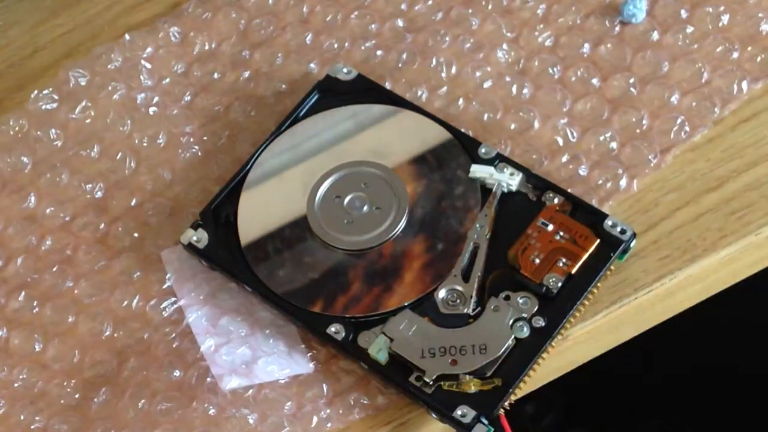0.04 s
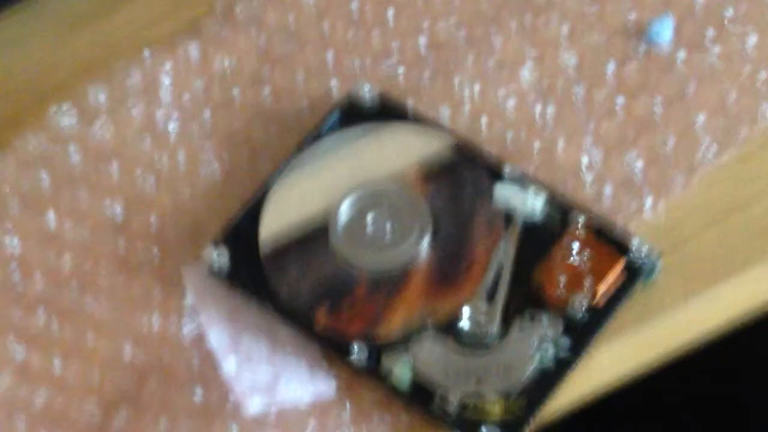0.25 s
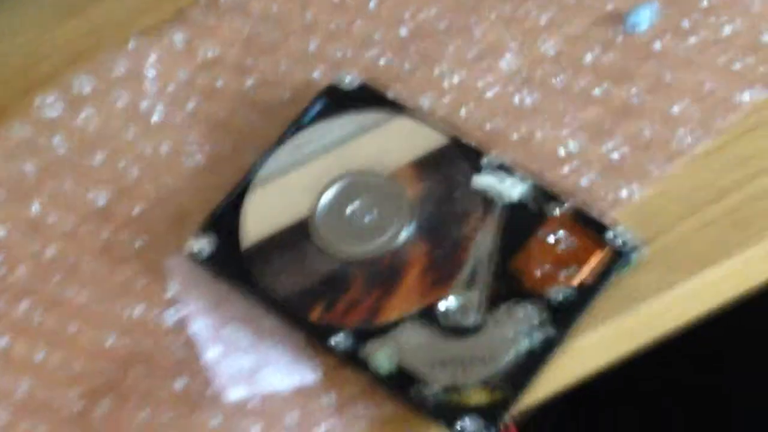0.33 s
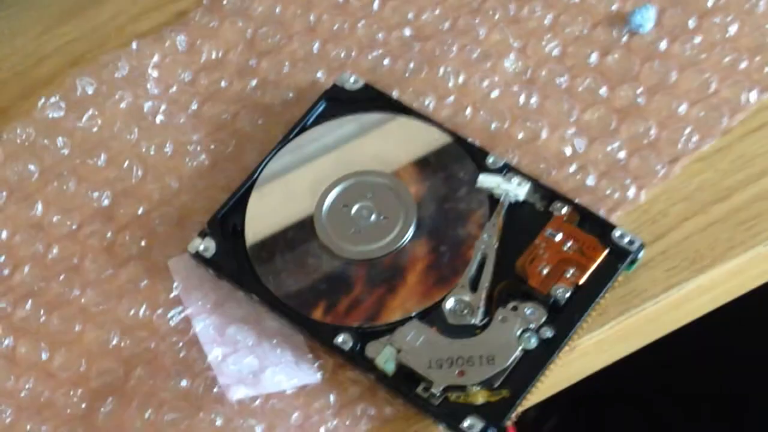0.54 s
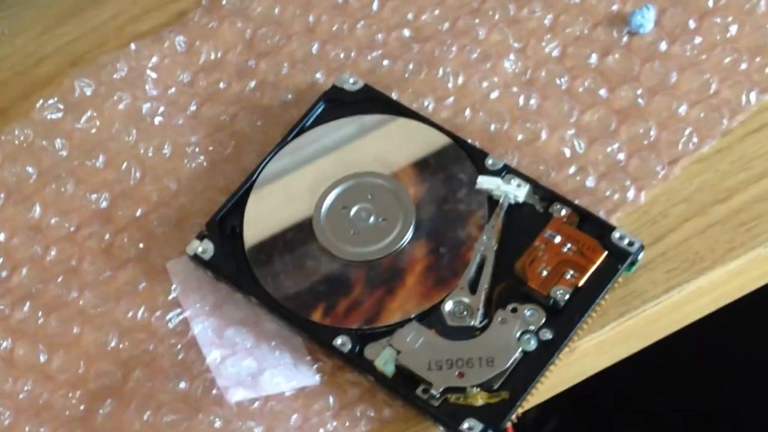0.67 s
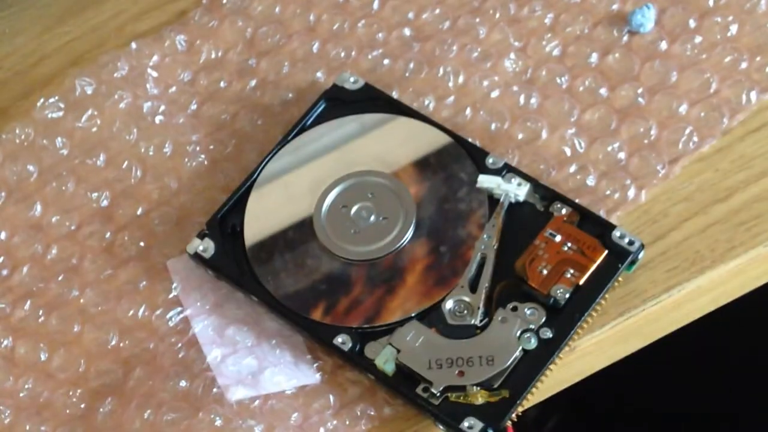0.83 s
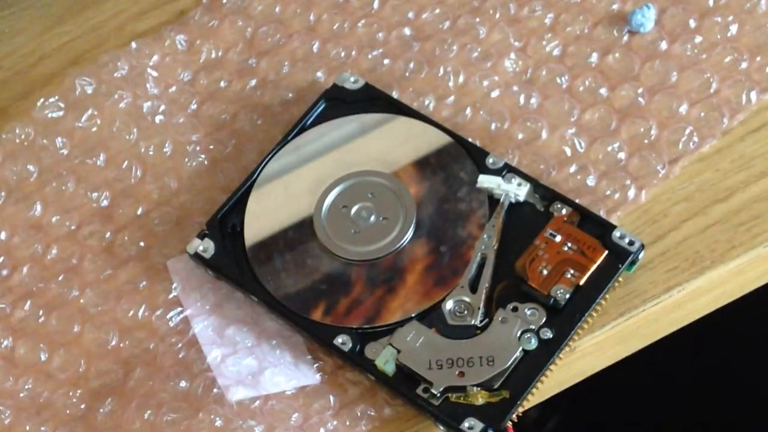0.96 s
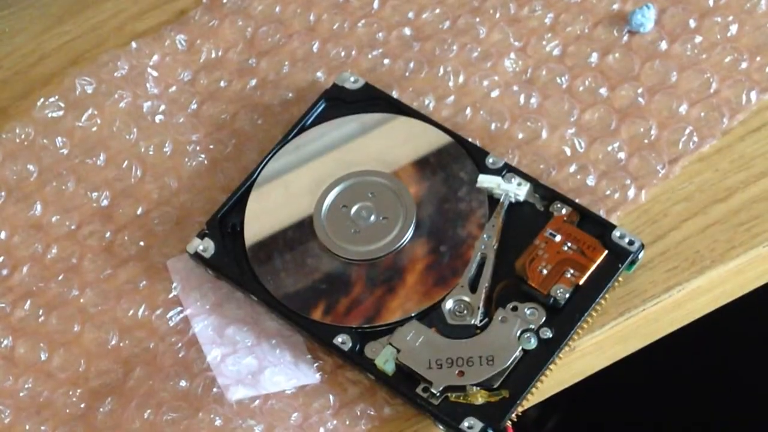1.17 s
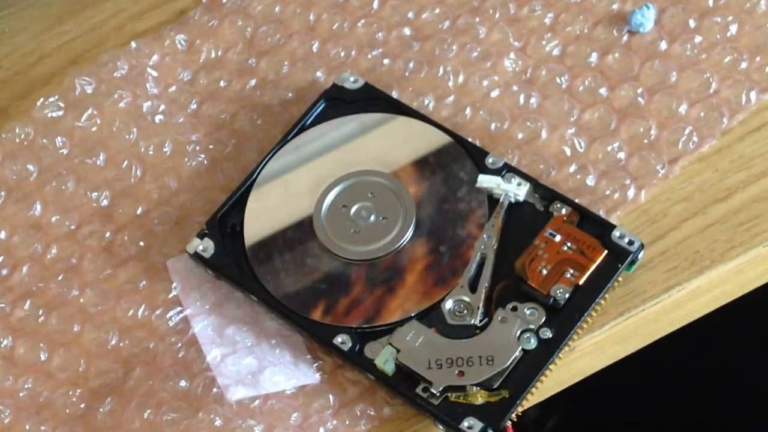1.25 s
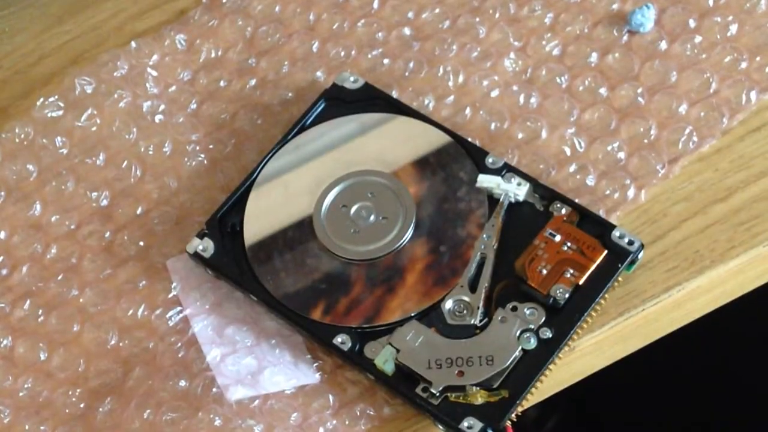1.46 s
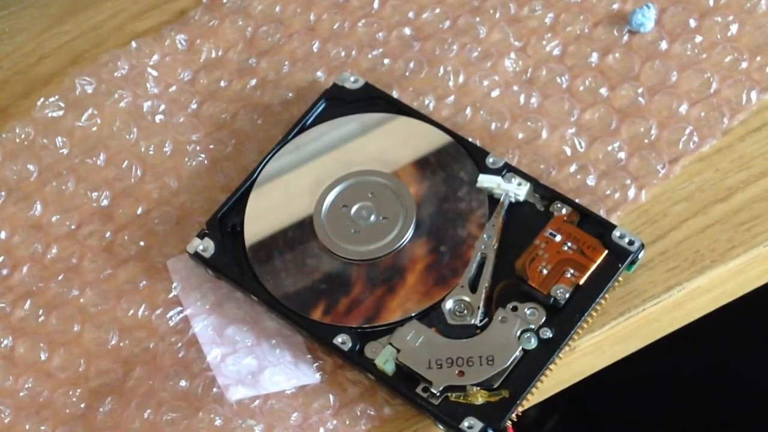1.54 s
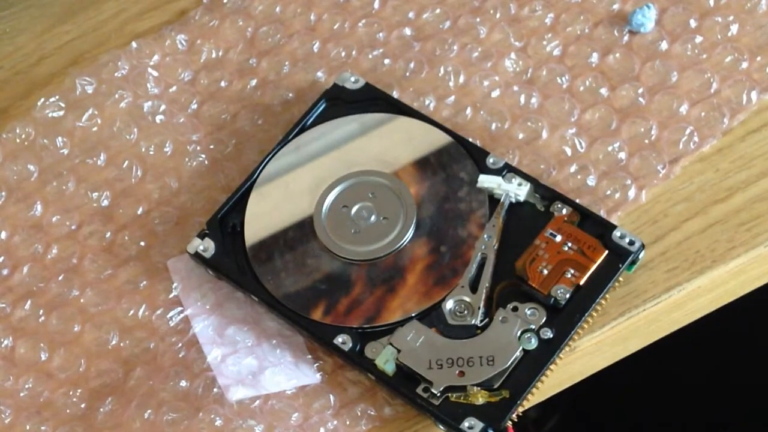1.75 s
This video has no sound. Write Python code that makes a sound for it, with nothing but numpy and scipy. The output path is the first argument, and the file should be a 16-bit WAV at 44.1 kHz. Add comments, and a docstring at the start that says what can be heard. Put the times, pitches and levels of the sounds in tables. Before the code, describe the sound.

An opened hard drive gives a tiny raspy buzz and hard metallic clack, rattles softly, then clacks twice more with low thuds of its support; close microphone, quiet room with faint hiss and hum.

```python
"""Small mechanism working once

A brief buzz, a hard clack, a rattle and a second pair of clacks sound close by in a quiet room.
Clacks are showers of contacts ringing casing modes; knocks, ticks and squeaks are resonant noise bands.
The buzz, a low panel ring and the thuds of the support are decaying sines; sliding is coloured contacts.
Diffuse tails follow the sources, over steady coloured noise and a faint hum."""
import sys
import numpy as np
from scipy import signal
from scipy.fft import rfft, irfft
from scipy.io import wavfile

SR = 44100
rng = np.random.default_rng(int(sys.argv[2]) if len(sys.argv) > 2 else 0)


def file_out(sig):
    """Save sig as 16-bit WAV at sys.argv[1]."""
    # one column per channel
    cols = np.atleast_2d(sig).T
    # limit, then scale
    lim = np.clip(cols, -1, 1)
    pcm = np.round(lim * 32767).astype(np.int16)
    wavfile.write(sys.argv[1], SR, pcm)


N = 79380  # samples


def undb(db):
    """Level to amplitude: 20 dB is a factor of ten."""
    return 10 ** (np.asarray(db) / 20)


def unit(x):
    """Normalisation to an rms of 1."""
    return x / np.sqrt(np.mean(x ** 2))


def since(start):
    """Elapsed time [s] since a moment, zero before it."""
    return np.maximum(np.arange(N) / SR - start, 0)


def fade(t, t60):
    """Exponential decay, falling 60 dB in t60 seconds."""
    return np.exp(-np.log(1000) * t / t60)


def envelope(start, attack, length, t60):
    """Linear rise from the start, then exponential decay from start + length onward."""
    rise = np.minimum(since(start) / attack, 1)
    return rise * fade(since(start + length), t60)


def burst(x, shape):
    """Energy normalisation: a signal under an envelope carries the energy of that envelope."""
    shaped = x * shape
    return shaped * np.linalg.norm(shape) / np.linalg.norm(shaped)


def octaves(hz):
    """Logarithmic frequency: distance in octaves of every spectral bin from hz."""
    bins_hz = np.arange(N // 2 + 1) * SR / N
    return np.log2(np.maximum(bins_hz, 1) / hz)


def colour(x, points, tilt_db=0):
    """Spectral shaping by interpolated levels and a tilt per octave, at rms 1."""
    hz, db = np.array(points, float).T
    pos = octaves(hz[0])
    gain_db = np.interp(pos, np.log2(hz / hz[0]), db)
    gain_db += tilt_db * np.maximum(pos, 0)
    gain_db += 10 * np.minimum(pos, 0)  # 10 dB per octave roll-off below the first point
    return unit(irfft(rfft(x) * undb(gain_db), N))


def band(hz, width, skirt=0):
    """Resonance: noise in a Gaussian band, width in octaves, over a flat skirt; rms 1."""
    response = np.exp(-.5 * (octaves(hz) / width) ** 2) + skirt
    return unit(irfft(rfft(rng.standard_normal(N)) * response, N))


CONTACTS_PER_S, CONTACT_SPREAD_DB = 5000, 2


def contacts():
    """Random impact process: dense tiny impulses of either sign and uneven strength."""
    hits = rng.random(N) < CONTACTS_PER_S / SR
    strength = undb(CONTACT_SPREAD_DB * rng.standard_normal(N))
    return hits * rng.choice([-1, 1], N) * strength


# spectrum of the room noise: (frequency [Hz], relative density [dB per Hz])
AIR_SPECTRUM = [(30, -28), (64, -9), (95, -8), (122, -4), (160, -8.5), (280, -8), (345, -10), (405, -3.5),
                (460, -9.5), (520, -7.5), (1030, -15.5), (2500, -16.5), (15000, -20)]
AIR_DB = -67
HUM_HZ, HUM_DB = 120, -80


def air():
    """Stationary noise: hiss and room murmur, with a faint mains hum as a pure tone."""
    murmur = colour(rng.standard_normal(N), AIR_SPECTRUM)
    hum = unit(np.sin(2 * np.pi * HUM_HZ * since(0)))
    return undb(AIR_DB) * murmur + undb(HUM_DB) * hum


# modes of a panel: (frequency [Hz], level [dB])
PANEL_MODES = [(308, -45.5), (370, -62)]
PANEL_S, PANEL_ATTACK_S, PANEL_LENGTH_S, PANEL_T60_S = .316, 0.0082, 0.07, .13


def panel():
    """Modal vibration: low modes swell together under the second pair of clacks, then decay."""
    tone = sum(undb(db) * np.sin(2 * np.pi * hz * since(PANEL_S)) for hz, db in PANEL_MODES)
    return tone * envelope(PANEL_S, PANEL_ATTACK_S, PANEL_LENGTH_S, PANEL_T60_S)


# spectrum of the sliding: (frequency [Hz], relative density [dB per Hz])
SLIDE_SPECTRUM = [(200, 7.5), (600, 4), (1250, -3.5), (2000, 4), (3200, -7.5), (5000, -7.5), (8000, -16),
                  (15000, -24.5)]
SLIDE_S, SLIDE_LENGTH_S, SLIDE_T60_S, SLIDE_DB = 0.241, 0.18, 0.17, -55


def sliding():
    """Friction noise: many small contacts make a soft scrape as parts move."""
    shape = envelope(SLIDE_S, 0.0072, SLIDE_LENGTH_S, SLIDE_T60_S)
    return undb(SLIDE_DB) * colour(contacts(), SLIDE_SPECTRUM) * shape


# squeaks of the settling parts: (time [s], length [s], level [dB], frequency [Hz])
SQUEAK_EVENTS = [(.433, 0.0041, -55, 5070), (0.438, 0.0039, -54.5, 5450), (0.446, 0.0072, -58.5, 5340),
                 (0.508, 0.0021, -62, 5000)]
SQUEAK_WIDTH_OCT, SQUEAK_T60_S = 0.12, 0.031


def squeaks():
    """Narrow-band friction: a small width in octaves gives noise a pitch as parts come to rest."""
    out = np.zeros(N)
    for start, length, db, hz in SQUEAK_EVENTS:
        shape = envelope(start, 0.0027, length, SQUEAK_T60_S)
        out += undb(db) * band(hz, SQUEAK_WIDTH_OCT) * shape
    return out


# thuds of the support:
# (time [s], level [dB], lower mode [Hz], rise [s], length [s], upper mode re lower [dB])
THUD_EVENTS = [(0.2035, -42, 71.8, 0.0095, 0.0365, -8.5), (.262, -35.5, 71.3, 0.008, 0.0218, -11.5),
               (0.3296, -38, 68, 0.0039, 0.01, -8), (0.393, -44, 64, 0.0053, 0.027, -16),
               (0.4218, -37.5, 65.4, 0.0037, 0.026, -1.5), (0.4688, -44, 64, 0.0046, 0.021, -4),
               (.556, -58, 71.3, 0.0078, 0.036, -12)]
SUPPORT_T60_S, UPPER_RATIO, UPPER_T60_S = 0.12, 1.755, 0.032


def thuds():
    """Damped oscillation: each jolt shakes the support in two low modes, the upper dying sooner."""
    out = np.zeros(N)
    for start, db, hz, rise, length, upper_db in THUD_EVENTS:
        phase = 2 * np.pi * hz * since(start)
        lower = np.sin(phase) * envelope(start, rise, length, SUPPORT_T60_S)
        upper = np.cos(UPPER_RATIO * phase) * envelope(start, rise, length, UPPER_T60_S)
        out += undb(db) * (lower - undb(upper_db) * upper)
    return out


# hollow knocks of the casing: (time [s], level [dB])
KNOCK_EVENTS = [(0.2114, -42), (0.373, -57)]
KNOCK_HZ, KNOCK_WIDTH_OCT, KNOCK_LENGTH_S, KNOCK_T60_S = 795, 0.28, 0.0064, 0.025


def knocks():
    """Resonance of the casing: a brief noise band gives a hollow note."""
    out = np.zeros(N)
    for start, db in KNOCK_EVENTS:
        shape = envelope(start, 0.0013, KNOCK_LENGTH_S, KNOCK_T60_S)
        out += undb(db) * burst(band(KNOCK_HZ, KNOCK_WIDTH_OCT), shape)
    return out


# dry ticks: (time [s], level [dB], centre [Hz], width [octaves], t60 [s])
TICK_EVENTS = [(.2083, -26.5, 5400, 0.27, 0.0035), (0.2085, -46, 10800, 0.1, .009),
               (0.2551, -43, 5170, 0.17, 0.0065), (0.2826, -42.5, 3800, 0.9, 0.0039),
               (0.3332, -33.5, 3900, 0.17, 0.01), (.3597, -31, 3230, 0.53, 0.0032),
               (0.4305, -40, 2600, 0.94, 0.0068), (0.4448, -38, 3060, 0.97, 0.0028),
               (0.4601, -54, 4530, .5, .005)]
TICK_SKIRT_DB = -32  # re the peak of the resonance


def ticks():
    """Heavily damped impact: loose parts touch with hardly any ring."""
    out = np.zeros(N)
    for start, db, hz, width, t60 in TICK_EVENTS:
        shape = envelope(start, .0001, 0.00013, t60)
        out += undb(db) * burst(band(hz, width, undb(TICK_SKIRT_DB)), shape)
    return out


# overtones of the buzz: (frequency [Hz], level re the fundamental [dB])
BUZZ_OVERTONES = [(2670, -12), (4750, -17), (6250, -12.5)]
BUZZ_S, BUZZ_LENGTH_S, BUZZ_ATTACK_S, BUZZ_T60_S = .2008, 0.0082, 0.0036, .014
BUZZ_HZ, BUZZ_DB, BUZZ_RASP_DB = 1727, -34, -10.5


def buzz():
    """Tone and noise combined: a few milliseconds of raspy tone as the mechanism starts to move."""
    phase = 2 * np.pi * since(BUZZ_S)
    wave = np.sin(BUZZ_HZ * phase)
    wave += sum(undb(db) * np.sin(hz * phase) for hz, db in BUZZ_OVERTONES)
    # root two gives the fundamental an rms of 1
    tone = np.sqrt(2) * wave * envelope(BUZZ_S, BUZZ_ATTACK_S, BUZZ_LENGTH_S, BUZZ_T60_S)
    rasp_shape = envelope(BUZZ_S, 0.00087, BUZZ_LENGTH_S, BUZZ_T60_S)
    rasp = burst(colour(contacts(), CLACK_SPECTRUM), rasp_shape)
    return undb(BUZZ_DB) * (tone + undb(BUZZ_RASP_DB) * rasp)


# clacks: (time [s], level [dB], treble tilt [dB per octave], casing ring before RING_DB [dB],
#          crack re clatter [dB], clatter t60 [s])
CLACK_EVENTS = [(.2081, -33, 4.5, 3.5, -37, 0.05), (.2148, -38, -1, 2.5, -27, 0.11),
                (0.2665, -45, -4.5, -15, -28, 0.089), (0.3334, -40.5, -3.5, -8, -17, 0.051),
                (0.358, -37.5, -1, 0.5, -8, 0.071), (0.3713, -36, -5, -13, -19, 0.03),
                (0.4065, -43.5, -16, -16, -20, 0.043)]
# modes of the casing: (frequency [Hz], relative level [dB])
CASING_MODES = [(768, -9.5), (1670, 1.5), (1918, -19), (2674, 2.5), (2800, -4), (3085, -5), (3320, -9),
                (3865, -4.5), (4445, -17), (4652, 0), (4820, -3.5), (5182, 0), (6163, -2), (6305, -4.5),
                (7080, -5), (7435, -6)]
# spectrum of the contacts, before tilt: (frequency [Hz], relative density [dB per Hz])
CLACK_SPECTRUM = [(150, -7), (550, -1.5), (850, -6.5), (1250, -5), (1900, 1), (3000, 5), (5500, 4),
                  (7200, -3), (8300, -15.5), (11500, -23), (15000, -36)]
CRACK_HZ, CRACK_WIDTH_OCT = 13400, 1
RING_DB, RING_T60_S = -6, 0.087


def casing_ring():
    """Modal superposition: steady casing modes summed at random phases, rms 1."""
    ring = np.zeros(N)
    for hz, db in CASING_MODES:
        cycles = hz * since(0) + rng.random()
        ring += undb(db) * np.sin(2 * np.pi * cycles)
    return unit(ring)


def clacks():
    """Impact excitation: each clack is a shower of contacts with a bright crack, and rings the casing."""
    out = np.zeros(N)
    for start, db, tilt_db, ring_db, crack_db, t60 in CLACK_EVENTS:
        t = since(start)
        attack = np.minimum(t / 0.0008, 1)
        clatter = colour(contacts(), CLACK_SPECTRUM, tilt_db)
        crack = undb(crack_db) * band(CRACK_HZ, CRACK_WIDTH_OCT)
        impact = burst(clatter + crack, attack * fade(t, t60))
        ring = burst(casing_ring(), attack * fade(t, RING_T60_S))
        out += undb(db) * (impact + undb(RING_DB + ring_db) * ring)
    return out


def room(x, t60, wet_db):
    """Reverberation: convolution with a diffuse, exponentially decaying noise tail."""
    tail = rng.standard_normal(N) * envelope(0.0061, 0.0012, .003, t60)
    tail /= np.linalg.norm(tail)
    return x + undb(wet_db) * signal.fftconvolve(x, tail)[:N]


ROOM_T60_S, ROOM_DB = 0.21, -11.5
LATE_T60_S, LATE_DB, BOOM_DB = 1.0, -23.5, -21  # the thuds share the late decay time


def scene():
    """Superposition: clicks die quickly in the room with a faint late tail, while the bass lingers."""
    clicks = panel() + sliding() + squeaks() + knocks() + ticks() + clacks()
    near = room(clicks, ROOM_T60_S, ROOM_DB)
    bright = room(buzz() + near, LATE_T60_S, LATE_DB)
    bass = room(thuds(), LATE_T60_S, BOOM_DB)
    return (air() + bass + bright)[None]


TOP_HZ = 15400


def record(dry):
    """Band limitation: the recorder drops the deepest bass and cuts the top steeply."""
    high_pass = signal.butter(3, 40, "high", fs=SR, output="sos")
    low_pass = signal.ellip(10, .2, 70, TOP_HZ, fs=SR, output="sos")
    thin = signal.sosfiltfilt(high_pass, dry, padtype="even")  # forward and backward: zero phase
    return signal.sosfilt(low_pass, thin)


dry = scene()
out = record(dry)
file_out(out)
```